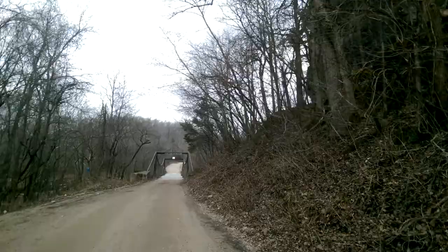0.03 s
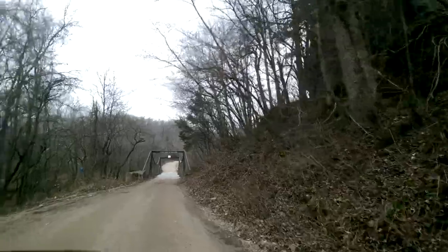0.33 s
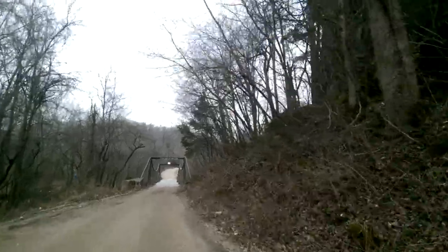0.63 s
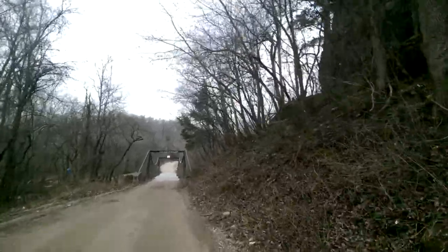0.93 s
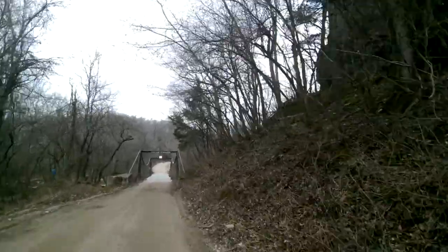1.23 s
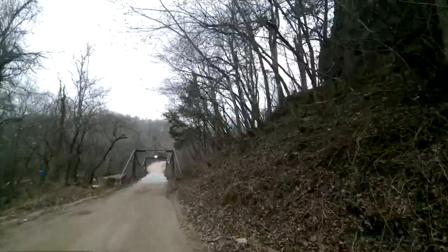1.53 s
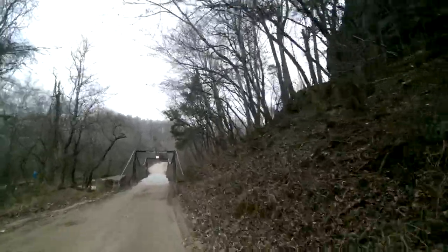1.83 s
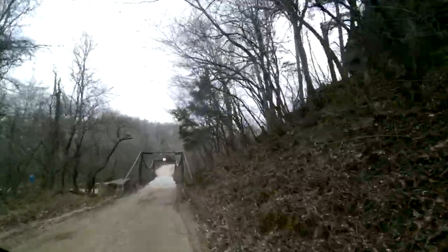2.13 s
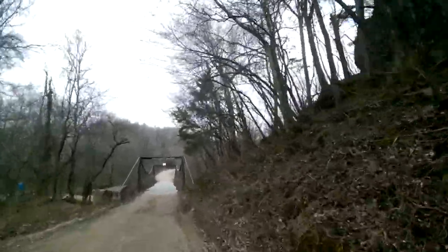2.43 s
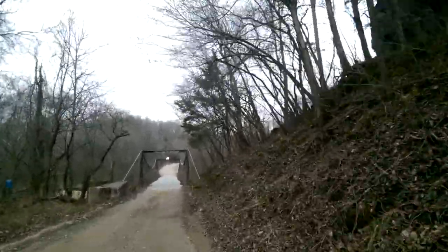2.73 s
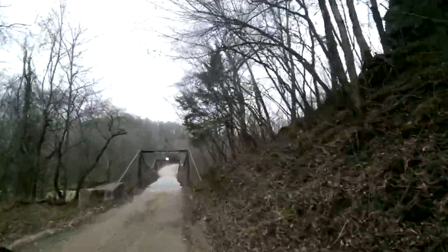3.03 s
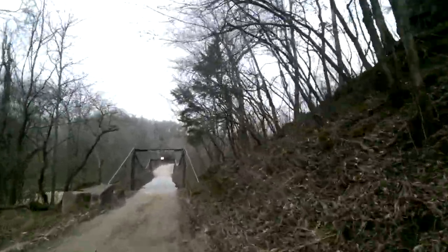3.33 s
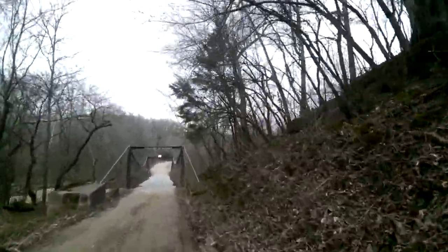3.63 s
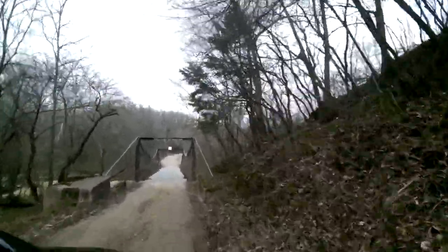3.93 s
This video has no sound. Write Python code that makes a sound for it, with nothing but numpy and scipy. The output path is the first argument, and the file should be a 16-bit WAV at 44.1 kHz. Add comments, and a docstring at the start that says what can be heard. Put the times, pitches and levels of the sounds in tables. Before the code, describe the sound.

Wind buffets the microphone as a vehicle rolls slowly along a gravel road.

```python
"""A vehicle rolls slowly along a gravel road, heard out in the moving air.
After a moment of silence, wind rumbles and rushes over each microphone port, above the drone of the
running gear and the hiss of the tyres. Eddies start to pop; the tyres crunch and throw up fine sand.
A loose metal part pings at 0.6 s, then flicked stones click now and then. From 2.8 s bumps knock
the body, with a fainter ping and the hardest knock at the very end."""
import sys
import numpy as np
from scipy import signal
from scipy.fft import rfft, irfft, next_fast_len
from scipy.io import wavfile
from scipy.ndimage import map_coordinates

SR = 44100
rng = np.random.default_rng(int(sys.argv[2]) if len(sys.argv) > 2 else 0)


def pcm_store(signal):
    """Save signal as 16-bit PCM."""
    levels = np.round(np.clip(np.atleast_2d(signal), -1, 1) * 32767)
    wavfile.write(sys.argv[1], SR, levels.astype(np.int16).T)


N = 176400

# how hard the tyres work the gravel (time [s], relative level [dB])
ROLLING = [(0.13, -61), (0.21, -58.5), (0.33, -52.5), (0.37, -49.5), (0.59, -52.5), (0.65, -51),
           (0.97, -52), (1.25, -53), (1.63, -52), (2.09, -52), (2.13, -51.5), (2.71, -54), (2.77, -54),
           (2.97, -53), (3.73, -53.5), (3.95, -53)]


def amp(db):
    """Decibels to gain."""
    return 10 ** (np.asarray(db) / 20)


def unit(x):
    """Each channel at rms 1."""
    return x / np.sqrt(np.mean(x ** 2, axis=-1, keepdims=True) + 1e-20)


def clock():
    """Time of each sample in seconds."""
    return np.arange(N) / SR


def curve(rows):
    """An envelope: (time, value) points joined by lines."""
    return np.interp(clock(), *np.transpose(rows))


def pan(db):
    """Left and right gains for a level difference; positive leans left."""
    return amp(np.array([[db], [-db]]) / 2)


def swells(rows):
    """Bell-shaped stereo fades, one for each (time, level, half length, left-right) row."""
    return sum(pan(side_db) * amp(db) * np.exp(-((clock() - s) / half_s) ** 2 / 2)
               for s, db, half_s, side_db in rows)


def wobble(rate):
    """A smooth random curve, rate knots a second."""
    return map_coordinates(rng.standard_normal(2048), [clock() * rate], mode="mirror")


def filtered(x, response):
    """x through an EQ whose gain is a function of frequency."""
    size = next_fast_len(N + SR // 2)
    return irfft(rfft(x, size) * response(np.fft.rfftfreq(size, 1 / SR)), size)[..., :N]


def coloured(x, spectrum):
    """x through an EQ of (frequency, gain) points, at rms 1."""
    f, db = np.transpose(spectrum)
    return unit(filtered(x, lambda hz: amp(np.interp(np.log(hz + 1), np.log(f + 1), db))))


def noise():
    """Unrelated white noise on the two channels."""
    return rng.standard_normal((2, N))


def grains(rate, spread_db):
    """Random impulses of uneven size on two channels, rate a second."""
    size = amp(spread_db * np.minimum(rng.exponential(size=(2, N)), 4))
    return unit((rng.random((2, N)) < rate / SR) * size * np.sign(noise()))


def eddy(t, width_ms, sharp=0.66, tip_ms=0.34, steep=2.1):
    """Pressure of a passing eddy: a peak between two troughs, with a pointed tip."""
    ms = t * 1000
    u = (ms / width_ms) ** 2
    cusp = np.exp(-steep * np.hypot(ms, tip_ms) / width_ms)
    trough = np.exp(-u / 2)
    pointed = cusp - trough * cusp.sum() / trough.sum()
    rounded = (1 - 4 * u) * np.exp(-2 * u)
    return sharp * pointed / pointed.max() + (1 - sharp) * rounded


def wind(rumble_db=4.0, flutter_db=4.0, small_db=-7, small_ms=1.39, large_db=-6, large_ms=2.85):
    """Each port has its own fluttering rumble and its own stream of small and large eddies."""
    # buffeting on each port (time [s], relative level [dB])
    gusts_left = [(0.13, -35), (0.23, -38), (0.43, -26), (0.59, -31.5), (0.65, -31), (0.85, -32.5),
                  (1.21, -27.5), (1.27, -30), (1.47, -28.5), (1.53, -38), (1.87, -33.5), (1.95, -26),
                  (2.07, -33.5), (2.23, -30), (2.37, -35.5), (2.97, -27), (3.27, -31), (3.37, -28.5),
                  (3.49, -31.5), (3.63, -33), (3.95, -30)]
    gusts_right = [(0.13, -51), (0.43, -36), (0.57, -41), (0.73, -30.5), (0.99, -48.5), (1.21, -28),
                   (1.29, -45), (1.33, -37.5), (1.51, -40.5), (1.59, -26.5), (1.67, -63), (1.73, -36.5),
                   (1.83, -33), (1.99, -27.5), (2.37, -38), (2.77, -27.5), (2.93, -37), (3.23, -35.5),
                   (3.31, -35.5), (3.47, -32), (3.91, -34), (3.95, -33)]
    # bass-heavy tone of the rumble (frequency [Hz], gain [dB])
    rumble_eq = [(15, -38), (28, -14), (48, 3), (90, 3.5), (150, -1.5), (250, -8.5), (400, -19.5),
                 (700, -22.5), (1500, -48), (4000, -78)]
    strength = amp([curve(gusts_left), curve(gusts_right)])
    flutter = amp(flutter_db * np.clip([wobble(28.094), wobble(28.024)], -2, 1.3))
    t = np.arange(-SR // 20, SR // 20) / SR
    air = amp(rumble_db) * unit(flutter * coloured(noise(), rumble_eq))
    for db, width_ms in [(small_db, small_ms), (large_db, large_ms)]:
        arrivals = grains(130, spread_db=1.0)
        stream = signal.fftconvolve(arrivals, eddy(t, width_ms)[None], "same", axes=1)
        air += amp(db) * unit(flutter * stream)
    return strength * air


def rush(left_db=2, right_db=-8, flutter_db=2.5, crossfeed=0.075):
    """Air streams over the microphone, mostly on its left side."""
    # rise and fall of the airflow (time [s], relative level [dB])
    airflow = [(0.13, -50), (0.22, -69), (0.43, -41.5), (0.57, -54), (0.74, -43.5), (0.82, -51.5),
               (0.97, -53), (1.05, -38.5), (1.2, -41), (1.35, -48), (1.45, -41), (1.67, -48.5), (1.9, -40),
               (2.01, -38), (2.33, -40.5), (2.43, -36), (2.63, -42.5), (2.83, -39), (2.89, -42.5),
               (3.63, -43.5), (3.77, -48), (3.95, -44)]
    # its breathy midrange (frequency [Hz], gain [dB])
    rush_eq = [(150, 1), (400, 5.5), (800, 4.5), (1200, 0), (1800, -6.5), (3000, -12.5), (5000, -22.5),
               (9000, -58)]
    air = noise()
    flutter = np.clip(wobble(35), -2, 1)
    envelope = amp(curve(airflow) + flutter_db * flutter)
    return amp([[left_db], [right_db]]) * envelope * coloured(air + crossfeed * air[::-1], rush_eq)


def drone(level_db=-36, sway_db=4.5):
    """Low drone of the running gear, swelling with the rolling of the tyres."""
    # dark tone of the running gear (frequency [Hz], gain [dB])
    drone_eq = [(20, -8), (45, -15.5), (75, -4.5), (96, 2), (120, -3), (200, -9.5), (400, -26),
                (800, -33.5), (1600, -32.5), (4000, -65.5)]
    rolling_db = curve(ROLLING) - curve(ROLLING).mean()
    return amp(level_db + rolling_db + sway_db * wobble(5.82)) * coloured(noise(), drone_eq)


def tyres(gain_db=2, pan_db=-3.0, grain_db=-3, flicker_db=0.83, crossfeed=0.0165):
    """Countless small stones grind under the tyres and blur into a hiss."""
    # tone of fine gravel (frequency [Hz], gain [dB])
    gravel_eq = [(200, -1.5), (700, -1), (1400, -0.5), (2200, 2), (3200, 1.5), (4200, -6), (5000, -12.5),
                 (6000, -19.5), (8500, -22), (10000, -27.5), (15500, -33.5)]
    grit = noise() + amp(grain_db) * grains(900, spread_db=4.0)
    grit = grit + crossfeed * grit[::-1]
    envelope = amp(gain_db + curve(ROLLING) + flicker_db * wobble(30.24))
    return pan(pan_db) * envelope * coloured(grit, gravel_eq)


def pops(tip_share=0.17, sharp=1.0, steep=1.4, wake_db=-17.5, wake_half_s=0.0059):
    """Big eddies thump one port in a wake of churned air; the narrower the eddy, the harder its tip."""
    # the strongest eddies (time [s], peak [dB], width [ms], port [0 left, 1 right])
    big_eddies = [(0.189, -19, 3.8, 0), (0.2874, -14, 1.8, 0), (0.293, -16.5, 1.5, 0), (0.321, -14, 4.6, 0),
                  (.327, -7, 1.58, 0), (0.3328, -16.5, 1.9, 0), (0.4343, -6.5, 2.9, 0),
                  (0.4423, -10.5, 5.8, 0), (0.4691, -10.5, 2.15, 0), (0.552, -11, 9.4, 0),
                  (.632, -8.5, 4.8, 0), (0.638, -14.5, 2.6, 0), (0.6442, -4, 2.7, 0), (0.6503, -9, 0.87, 0),
                  (0.6551, -3.5, 4.1, 0), (.722, -6, 1.02, 1), (0.807, -15, 2.4, 1), (1.1157, -10, 2.6, 0),
                  (1.174, -20, 5.1, 1), (1.205, -13.5, 1.25, 1), (1.423, -9.5, 5.3, 0),
                  (1.4575, 0.5, 1.74, 0), (1.464, -8.5, 2.3, 0), (1.4678, -2, 0.94, 0),
                  (1.573, -7.5, 4.2, 1), (1.5928, -16, 1.8, 1), (1.8782, -10, 2.15, 1), (1.934, -8, 6, 1),
                  (1.958, -6, 4.3, 0), (1.9648, -7.5, 3.6, 1), (2.003, -12.5, 2.2, 1),
                  (2.0592, -9, 1.42, 1), (2.1465, -10, 1.2, 1), (2.1981, -12.5, 1.6, 1),
                  (2.4671, -10, 1.54, 1), (2.525, -15.5, 1.5, 1), (2.669, -14.5, 2.7, 1),
                  (2.6959, -12, 2.8, 1), (2.703, -14, 1.5, 1), (2.7757, -10.5, 1.43, 1),
                  (2.974, -13, 3.3, 0), (3.452, -13, 1.8, 1), (3.482, -14, 1.9, 1), (3.6199, -4.5, 3.3, 0),
                  (3.852, -17, 1.9, 0)]
    # tone of the churned air (frequency [Hz], gain [dB])
    churn_eq = [(30, -7), (90, 1), (200, 3.5), (450, -5), (800, -20), (1500, -28.5), (4000, -74)]
    out = np.zeros((2, N))
    t = np.arange(-SR // 10, SR // 10) / SR
    churn = coloured(noise(), churn_eq)
    for s, db, width_ms, port in big_eddies:
        start = round(s * SR) - len(t) // 2
        span = slice(start, start + len(t))
        wake = amp(wake_db) * churn[port, span] * np.exp(-(t / wake_half_s) ** 2 / 2)
        out[port, span] += amp(db) * (eddy(t, width_ms, sharp, tip_share * width_ms, steep) + wake)
    return out


def crunches():
    """The tyres bite into looser gravel: short, dense clusters of stone contacts."""
    # each bite (time [s], level [dB], half length [s], left-right [dB])
    bites = [(0.369, -42.5, 0.011, -6), (0.4, -42, 0.012, -6), (0.884, -45, 0.011, -7),
             (1.1, -43.5, 0.013, -9.5), (1.865, -43.5, 0.0091, -8), (2.125, -43.5, 0.0068, -12),
             (2.412, -37.5, 0.019, 0), (2.78, -42, 0.027, 3), (3.057, -49, 0.01, -11),
             (3.564, -44.5, 0.017, 6)]
    # mid-heavy tone of loose gravel (frequency [Hz], gain [dB])
    crunch_eq = [(300, 6), (900, 10.5), (2000, -1), (3500, -2), (5000, -10.5), (6300, -23), (8800, -33),
                 (11000, -45), (15500, -39)]
    return swells(bites) * coloured(grains(2500, spread_db=3.0), crunch_eq)


def sand():
    """Fine sand thrown up by the tyres patters brightly around some of the crunches."""
    # each spray (time [s], level [dB], half length [s], left-right [dB])
    sprays = [(0.423, -70, 0.03, -2), (1.87, -62.5, 0.018, -4), (2.128, -66, 0.018, -3),
              (2.767, -58.5, 0.014, -7), (3.56, -63.5, 0.013, 2)]
    # bright tone of the sand (frequency [Hz], gain [dB])
    sand_eq = [(2000, -13), (3500, 1), (5000, 3), (7000, -3.5), (9000, -6), (11000, -18), (15500, -24)]
    return swells(sprays) * coloured(grains(3000, spread_db=2.5), sand_eq)


def pings(attack_s=0.001, rough=0.22, rough_rate=110):
    """Stones strike a loose metal part on the right; its rattling roughens each ringing mode."""
    # each strike (time [s], level [dB], left-right [dB])
    strikes = [(.622, -42, -14), (3.819, -53.5, -10)]
    # modes of the metal part (frequency [Hz], relative level [dB], t60 [s])
    metal_modes = [(3025, -2, 0.31), (3190, 3, 0.1), (3370, -5, 0.028), (3690, -2.5, 0.052),
                   (5280, -15, 0.1), (7260, -28, 0.05), (8931, -29, 0.17)]
    out = np.zeros((2, N))
    for s, level_db, side_db in strikes:
        t = np.maximum(clock() - s, 0)
        ring = np.zeros(N)
        for hz, db, t60 in metal_modes:
            envelope = amp(db - 60 * t / t60) * (1 + rough * wobble(rough_rate))
            phase = 2 * np.pi * (hz * t + rng.random()) + rough * wobble(rough_rate)
            ring += envelope * np.sin(phase)
        out += amp(level_db) * pan(side_db) * ring * (1 - np.exp(-t / attack_s))
    return out


def stones(snap=6.4, snap_s=0.00026, width_oct=0.6, top_hz=4800, top_db=-11, grit_db=-17, grit_s=0.028):
    """Flicked stones click: a snap and a brief ring in a broad band round their pitch, then grit."""
    # stones the tyres flick (time [s], peak [dB], pitch [Hz], left-right [dB], t60 [s])
    flicks = [(0.878, -29, 1860, -8, 0.0092), (0.8846, -23, 1600, -3, 0.036),
              (1.863, -29.5, 2600, -6, 0.0225), (2.7203, -34, 5600, 11.5, 0.0083),
              (2.753, -27.5, 2580, -9, 0.015), (2.772, -30.5, 2100, -10, 0.053),
              (3.03, -29, 2520, -10, 0.0076), (3.5684, -28, 2650, -2, 0.025)]
    out, t = np.zeros((2, N + SR)), np.arange(SR // 10) / SR
    f, half = np.fft.rfftfreq(len(t), 1 / SR) + 1, len(t) // 2
    shelf = amp(top_db) + 1 / (1 + (f / top_hz) ** 8)
    for s, db, hz, side_db, t60 in flicks:
        grit = rng.exponential(size=len(t) // 90 + 1).repeat(90)[:len(t)]  # a new level every 2 ms
        envelope = amp(-60 * t / t60) + snap * np.exp(-t / snap_s)
        envelope += amp(grit_db) * np.exp(-t / grit_s) * grit
        burst = rng.standard_normal((2, len(t))) * envelope
        band = shelf * np.exp(-(np.log2(f / hz) / width_oct) ** 2 / 2)
        click = irfft(rfft(np.roll(burst, half, axis=1)) * band)  # centred, so the band has room to ring
        click /= abs(click).max(1, keepdims=True)
        out[:, round(s * SR) - half:][:, :len(t)] += amp(db) * pan(side_db) * click
    return out[:, :N]


def knocks(crack_s=0.0055, scatter_db=2.0):
    """Each bump rings the vehicle's body with a short crack; a soft contact dulls the high modes."""
    # each bump (time [s], peak [dB], left-right [dB], hardness as low-pass cutoff [Hz])
    bumps = [(2.7719, -20.5, -12, 1080), (2.779, -19, -8, 700), (3.03, -26, -20, 596),
             (3.9933, -13.5, -10, 2320)]
    # modes of the body (frequency [Hz], relative level [dB], t60 [s])
    body_modes = [(242, -5, 0.035), (557, -4, 0.014), (741, -12.5, 0.062), (896, -8.5, 0.075),
                  (1027, -11, 0.099), (1337, 3, 0.016), (1757, -5, 0.04), (2330, -5, 0.023),
                  (3220, 4, 0.012)]
    out, t = np.zeros((2, N + SR)), np.arange(SR // 5) / SR
    for s, db, side_db, cutoff_hz in bumps:
        ring = np.zeros((2, len(t)))
        for hz, mode_db, t60 in body_modes:
            struck_db = mode_db + scatter_db * rng.standard_normal((2, 1))
            ring += amp(struck_db - 60 * t / t60) * np.sin(2 * np.pi * hz * t)
        crack = rng.standard_normal((2, len(t))) * np.exp(-t / crack_s)
        blow = signal.sosfilt(signal.butter(2, cutoff_hz, fs=SR, output="sos"), ring + crack)
        blow /= abs(blow).max(1, keepdims=True)
        out[:, round(s * SR):][:, :len(t)] += amp(db) * pan(side_db) * blow
    return out[:, :N]


def scene():
    """A bed of wind and rolling, with pops, gravel and hits on top."""
    bed = wind() + rush() + drone() + tyres()
    return bed + pops() + crunches() + sand() + pings() + stones() + knocks()


def record(dry, onset_s=0.115, fade_s=0.002, ceiling=0.92, top_hz=15750):
    """The microphone opens after a moment of silence, rounds off the peaks and cuts the top treble."""
    opened = dry * np.clip((clock() - onset_s) / fade_s, 0, 1)
    rounded = opened / (1 + (opened / ceiling) ** 8) ** (1 / 8)
    return filtered(rounded, lambda hz: hz < top_hz)


dry = scene()
out = record(dry)
pcm_store(out)
```